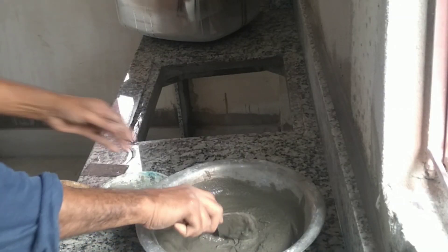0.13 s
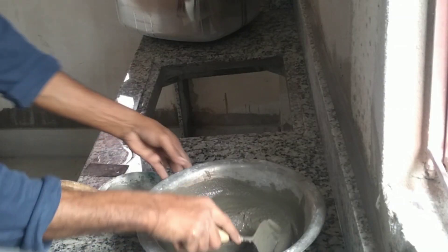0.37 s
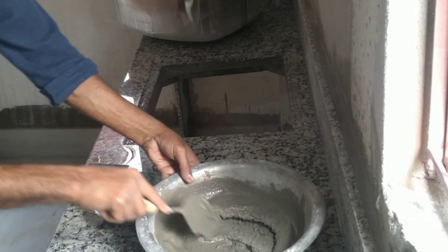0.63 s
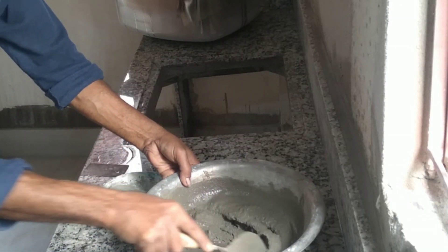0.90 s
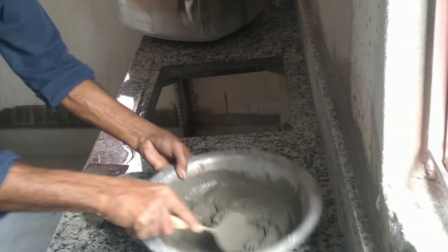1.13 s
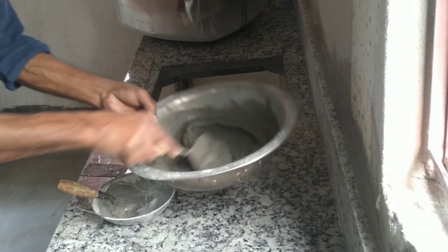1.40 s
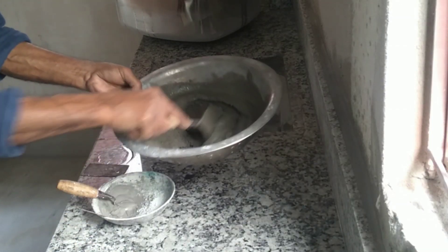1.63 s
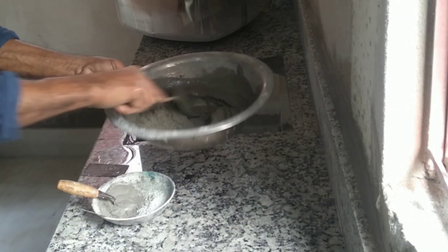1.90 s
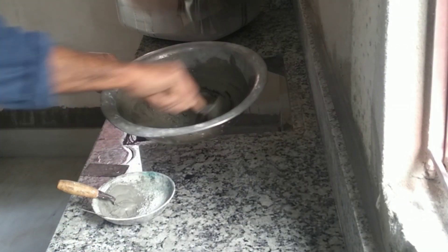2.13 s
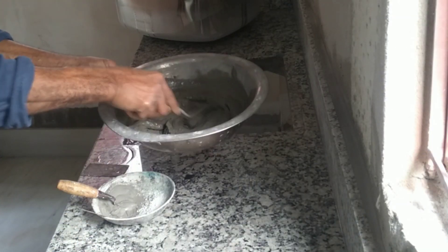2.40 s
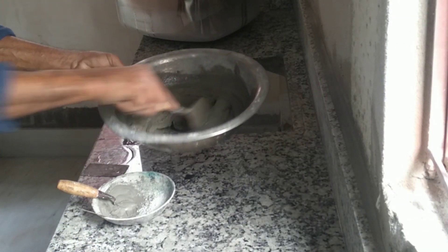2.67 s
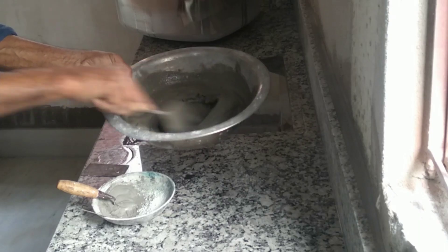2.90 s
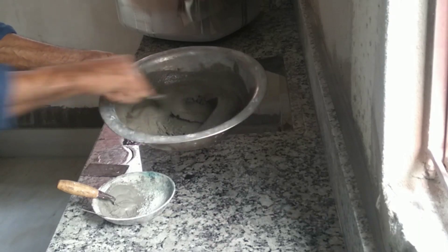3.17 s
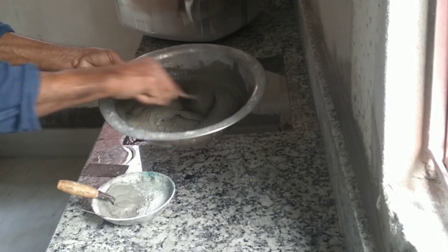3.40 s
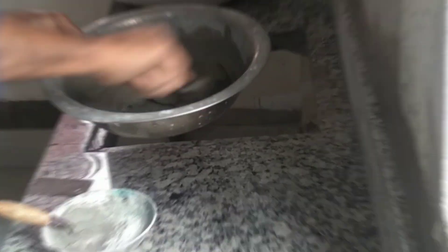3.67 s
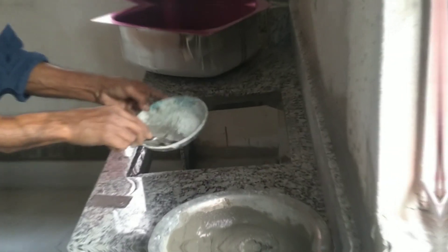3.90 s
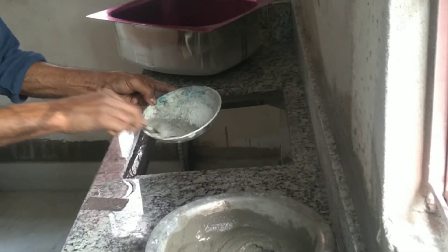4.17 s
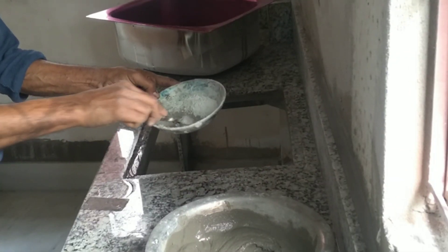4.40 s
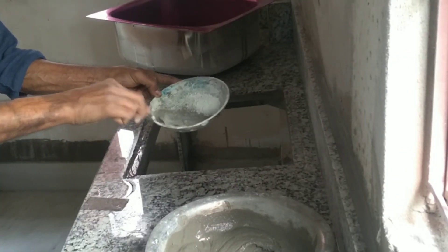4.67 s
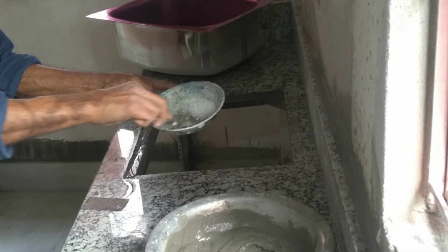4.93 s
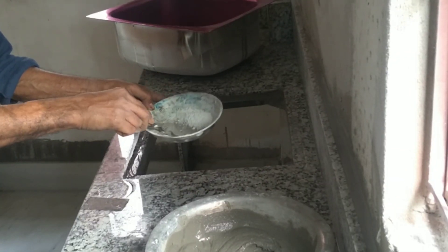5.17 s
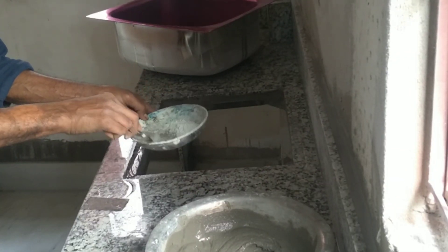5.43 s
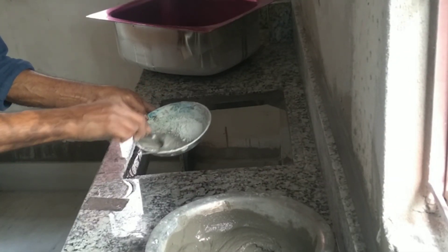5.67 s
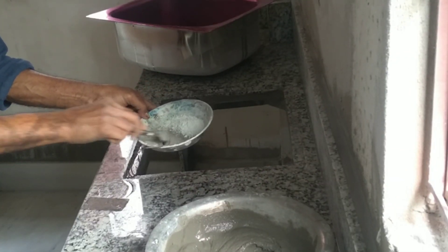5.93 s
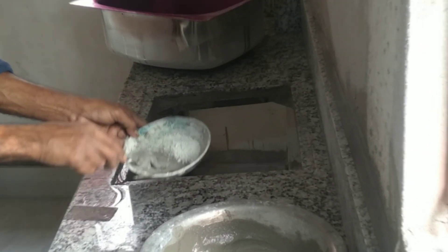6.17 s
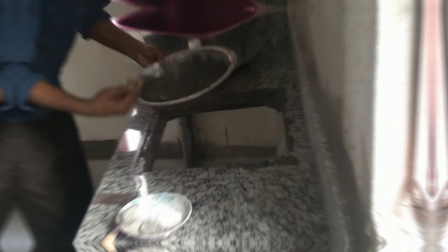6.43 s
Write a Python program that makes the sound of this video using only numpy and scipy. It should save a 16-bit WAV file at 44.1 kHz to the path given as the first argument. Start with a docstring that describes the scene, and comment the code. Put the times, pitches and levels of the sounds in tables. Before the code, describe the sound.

In a hard, echoing room, a steel trowel stirs gritty mortar in a big metal bowl, hesitant at first, then in quick, loud scrapes with clinks and a sharp knock. After a brief fade to silence, much quieter, thinner scrapes come from a small dish, with a faint distant chirp at first. Close stereo microphones, low rumble underneath.

```python
"""In a hard, echoing room, a trowel scrapes gritty mortar round a big metal bowl, then round a small dish.
Random ticks, like sand grains crushed under the blade, are coloured into a thud, boom, rasp and fizz.
Now and then steel clinks on steel: a noise crack, ringing tones and an echo tail.
Filtered noise makes the dull room tone and low rumble; chopped sine tones make a thin, far chirp.
Scraping, clinks and room tone share two brief fades to silence and back."""
import sys
import numpy as np
from scipy import signal
from scipy.fft import rfft, irfft, next_fast_len
from scipy.io import wavfile
from scipy.ndimage import uniform_filter1d, map_coordinates

SR = 44100
rng = np.random.default_rng(int(sys.argv[2]) if len(sys.argv) > 2 else 0)


def ratio(d):
    """dB to gain"""
    e = np.asarray(d, float) / 20
    return 10 ** e


def to_wav(s):
    """Save 16-bit WAV."""
    ch = np.atleast_2d(s).T  # columns
    pcm = np.round(np.clip(ch, -1, 1) * 32767)  # PCM
    wavfile.write(sys.argv[1], SR, pcm.astype(np.int16))


N = 289296  # length in samples

# Pushes of the blade through the mortar. Each row: start in seconds, rise in seconds, hold in seconds,
# scrape level in dB, boom in dB relative to the scrape, fizz in dB relative to the scrape.
PUSHES = [ (0, 0.078, 0.12, -59.5, 3.5, -6.5), (0.37, 0.035, .03, -40.5, -3, -6),
          (0.575, .02, 0.13, -63.5, -14, -3.5), (0.733, 0.0015, 0.063, -43.5, 2, -7),
          (0.784, 0.009, .002, -30.5, -9, -7.5), (0.989, 0.0044, 0.037, -48, 6.5, -1),
          (1.13, 0.025, .05, -64.5, -5, 0.5), (1.2, 0.016, 0.0022, -40.5, 2.5, -3.5),
          (1.373, 0.0029, 0.00223, -45.5, 0, 0.5), (1.385, .05, .03, -34.5, -9, -1.5),
          (1.486, 0.0059, .002, -32, -10, -12), (1.562, 0.011, .02, -37.5, -10, -15.5),
          (1.579, 0.049, 0.015, -30, -7, -8), (1.641, 0.033, .005, -32.5, -2, -9),
          (1.787, .01, 0.067, -35, 0, -4), (1.878, .025, 0.0022, -30, -7.5, -11.5),
          (2.071, .003, .02, -49, 7, -3), (2.096, 0.032, 0.071, -38.5, 0, -6),
          (2.181, .006, 0.036, -37.5, -0.5, 10.5), (2.207, 0.034, .015, -32.5, -2, 7),
          (2.344, 0.0057, 0.0014, -31.5, -26, 0), (2.37, 0.0075, .002, -27.5, -10.5, -10),
          (2.437, .015, .01, -41, 0, -9), (2.512, 0.029, .04, -44, -4, -3.5),
          (2.576, .016, 0.065, -37.5, 0.5, -1.5), (2.612, 0.06, 0.0016, -30, -9.5, -9),
          (2.711, .022, 0.0022, -32, -2.5, -7), (2.802, 0.0059, 0.05, -32, -0.5, -2.5),
          (2.902, 0.03, 0.052, -35, 1.5, -8.5), (3, 0.0036, 0.02, -34.5, -1, 3.5),
          (3.04, .01, .035, -33.5, -3.5, -9), (3.108, .03, 0.085, -34.5, -3.5, -3.5),
          (3.188, 0.049, 0.012, -27.5, -3.5, -9.5), (3.324, 0.0042, 0.025, -32, 1.5, -4.5),
          (3.359, 0.045, 0.0041, -34, 1, -2), (3.443, 0.016, .002, -44.5, 2.5, -9),
          (3.613, 0.0021, 0.00397, -56, -6.5, 6), (3.625, 0.024, .002, -48.5, -2, -4.5),
          (3.952, 0.0017, 0.0046, -60, -15, 11.5), (3.969, 0.038, .002, -49.5, 0.5, -6.5),
          (4.094, .02, 0.036, -68, 4, -1), (4.17, .025, .002, -56.5, -5, -4.5),
          (4.215, 0.025, .045, -54, -5, -5.5), (4.297, 0.0075, 0.026, -43.5, -9.5, -4),
          (4.434, 0.027, .015, -47, -7, -1), (4.47, 0.011, .002, -42, -11.5, -5),
          (4.53, .01, 0.026, -49.5, -12, -8), (4.593, 0.044, 0.035, -42.5, -9.5, -9),
          (4.702, 0.026, .01, -46, -10, -4), (4.767, 0.023, .002, -41, -9, -11),
          (4.9, .01, 0.091, -56.5, -9, -9), (4.965, 0.076, .002, -51.5, -4, 5),
          (5.08, 0.0244, .002, -51.5, -7, -13), (5.156, 0.019, 0.11, -59.5, -4, -13),
          (5.286, .02, 0.043, -68.5, -2, -5.5), (5.381, 0.034, 0.018, -60.5, -5, -10.5),
          (5.507, 0.055, 0.018, -53, -4, -0.5), (5.634, .034, .002, -44.5, -9.5, -6.5),
          (5.697, 0.035, .002, -41.5, -7.5, -2.5), (5.808, .01, 0.041, -49.5, -2.5, -2.5),
          (5.854, 0.039, .002, -41.5, -8.5, -11.5), (6.004, 0.018, 0.032, -72.5, 7, -1),
          (6.046, 0.036, .002, -49.5, -10, -7.5)]
# Where the blade's place moves the rings. Each row: time in seconds, bowl note in Hz, blade note in Hz.
MOVING_NOTES = [(0, 360, 2500), (.1, 660, 2080), (.47, 675, 2300), (.51, 350, 2500), (.72, 427, 3170),
                (.74, 580, 1900), (.8, 790, 2000), (.99, 800, 2100), (1.05, 673, 2000), (1.19, 725, 2150),
                (1.21, 530, 1800), (1.37, 524, 1450), (1.41, 554, 2800), (1.49, 550, 2500),
                (1.51, 365, 2300), (1.67, 540, 2030), (1.84, 495, 2000), (1.91, 450, 2800),
                (2.17, 785, 1620), (2.34, 710, 1837), (2.38, 348, 2240), (2.7, 546, 2040),
                (2.82, 365, 2160), (3.0, 570, 2300), (3.02, 407, 2600), (3.32, 405, 2350),
                (3.34, 950, 2250), (3.42, 464, 2080), (3.65, 346, 1408), (3.96, 542, 3160),
                (4.29, 455, 3300), (4.3, 480, 1820), (4.47, 590, 1500), (4.6, 418, 1910), (4.63, 925, 2800),
                (4.73, 415, 2850), (4.9, 365, 2800), (5.04, 420, 1550), (5.68, 490, 1600),
                (5.73, 780, 1850), (5.9, 780, 1560), (6.04, 540, 1960), (6.08, 530, 3460)]
# Thud through the counter. Each row: time in seconds, level in dB relative to the scrape.
THUD_LEVEL = [(0, -5.5), (.4, -10.5), (.75, -0.5), (.8, -17.5), (1.2, -11.5), (1.45, -15.5), (1.52, -14),
              (1.9, -20), (2.1, -5.5), (2.35, -13), (2.7, -27), (2.82, -14), (3.3, -23.5), (3.5, -16),
              (3.6, -24), (3.63, 2), (3.72, -17), (3.99, -33), (4.2, -14), (4.5, -28), (4.9, -9.5),
              (5.6, -17.5), (6.1, -24.5)]
# Times when the scraping sound sinks abruptly. Each row: start in seconds, end in seconds, depth in dB.
SCRAPE_GAPS = [(.272, 0.36, 60), (3.772, 3.957, 61.5), (5.364, 5.391, 10), (5.465, 5.496, 22),
               (6.24, 6.595, 60)]
# Colours of the four scraping layers. Each row: pitch in Hz, strength in dB per Hz.
THUD_COLOUR = [(88, -35.5), (150, -6.5), (199, -8.5), (264, 2.5), (312, 1), (380, -7), (490, -39),
               (840, -120)]
BOOM_COLOUR = [(190, -42.5), (320, -5), (539, 2), (706, -1), (878, 1), (981, -7.5), (1300, -15),
               (1690, -46), (2860, -120)]
RASP_COLOUR = [(530, -41.5), (900, -19.5), (979, -2.5), (1360, -2.5), (2270, -3), (2710, -4), (3330, -1),
               (5600, -14), (7280, -34.5), (12300, -120)]
FIZZ_COLOUR = [(2650, -22), (4500, -1.5), (5620, 0), (7070, -2), (9020, 3.5), (9410, 2), (10900, -11.5),
               (15100, -25), (16000, -22.5)]
# Fixed rings of the mortar-damped bowl. Each row: pitch in Hz, width in Hz, lift in dB.
BOWL_RINGS = [(230, 15, 6), (387, 60, 3), (535, 25, 5), (780, 40, 3), (897, 25, 5), (2290, 90, 2),
              (3410, 60, 1.5)]
# Fixed rings of the small dish, used after the first fade. Each row: pitch in Hz, width in Hz, lift in dB.
DISH_RINGS = [(1290, 40, 4), (1550, 30, 3), (1850, 45, 3), (3030, 55, 3), (3700, 40, 2)]
# How alike left and right are. Each row: pitch in Hz, likeness from 0 to 1.
LEFT_RIGHT_LIKENESS = [(30, .75), (60, .85), (120, .95), (190, .9), (300, .4), (1000, .08), (8000, .08)]
# Rumble levels. Each row: time in seconds, deep buffet in dB, hum in dB.
RUMBLE_LEVELS = [(0.0, -48, -56), (0.09, -54, -55.5), (0.11, -56, -54.5), (0.55, -50, -58.5),
                 (0.62, -44, -60), (0.78, -44.5, -52), (0.84, -41.5, -56), (1.09, -66, -56),
                 (1.2, -55.5, -53.5), (3.49, -59, -55.5), (3.69, -72, -66), (3.76, -79, -84),
                 (3.85, -58, -63.5), (4.29, -51.5, -56.5), (5.85, -46, -59), (6.27, -65.5, -67.5),
                 (6.34, -76.5, -83.5), (6.56, -63, -63)]
# Colours of the deep buffet and the hum. Each row: pitch in Hz, strength in dB per Hz.
BUFFET_COLOUR = [(7.1, -24.5), (12, 11.5), (31, 2), (60, -13), (78, -34.5), (130, -120)]
HUM_COLOUR = [(29, -32), (50, -4), (75, -9), (103, -8), (200, -20), (260, -41), (440, -120)]
# Room tone, heard in the pauses. Each row: time in seconds, level in dB.
AIR_LEVEL = [(0, -68.5), (.4, -63), (3.7, -71), (3.95, -68.5), (5.5, -67), (6.2, -76.5), (6.56, -74)]
# Colour of the room tone. Each row: pitch in Hz, strength in dB per Hz.
AIR_TINT = [(150, -28), (260, -3.5), (486, -16.5), (560, -11.5), (714, -20.5), (1300, -31.5), (1690, -56.5),
            (2860, -120)]
# Faint hiss of the microphones. Each row: time in seconds, level in dB.
HISS_LEVEL = [(0, -61), (.4, -88), (3.8, -79.5), (3.95, -76), (6.2, -103), (6.56, -95)]
# Colour of the hiss. Each row: pitch in Hz, strength in dB per Hz.
HISS_TINT = [(760, -30), (1300, 0), (1410, 1), (5970, -6.5), (8990, -8), (12000, -19), (15600, -49),
             (22000, -120)]
# Steel contacts. Each row: time in seconds, crack peak in dB, favoured pitch in Hz,
# ring in dB relative to the crack.
STEEL_CONTACTS = [(0.372, -50, 305, 12), (0.376, -53.5, 640, 16), (0.4, -47.5, 232, 3.5),
                  (0.73, -48.5, 155, 12), (0.732, -30, 1940, -4), (0.789, -17.5, 1993, -1.5),
                  (0.814, -21.5, 725, -8), (0.996, -35, 725, 4.5), (1.212, -46.5, 540, 10),
                  (1.376, -31.5, 1430, -1), (1.495, -13, 2345, -9.5), (1.614, -25, 1870, 10.5),
                  (1.681, -25, 2130, -9.5), (1.802, -20.5, 810, -4), (1.905, -15, 3380, -5.5),
                  (2.182, -23, 830, -15.5), (2.348, -17, 2970, -1.5), (2.361, -13.5, 3130, -10.5),
                  (2.372, -5.5, 4000, -9.5), (3.051, -14.5, 880, -10), (3.243, -13, 2320, -6.5),
                  (3.258, -24, 2567, 1.5), (3.331, -19, 882, 3.5), (3.354, -18, 858, -1.5),
                  (3.615, -41, 8870, 5), (3.956, -49, 8900, 5), (3.96, -41, 3420, 0),
                  (3.983, -56, 540, 12.5), (4.8, -34, 3010, 3), (6.085, -42, 3400, 0.5)]
# Modes a steel contact can ring. Each row: pitch in Hz, time to die by 60 dB in seconds.
STEEL_MODES = [(155, .08), (232, 0.57), (305, 0.35), (540, 0.17), (640, 0.35), (725, .06), (885, 0.064),
               (1430, 0.046), (1840, 0.075), (1960, .035), (2134, .05), (2325, 0.0461), (2580, .055),
               (3010, .035), (3400, 0.079), (4000, 0.045), (8900, 0.038)]
# How long the room echoes. Each row: pitch in Hz, time to die by 60 dB in seconds.
ECHO_TIMES = [(200, .36), (2000, .32), (10000, .22)]
# Dips to silence. Each row: quietest moment in seconds, fade-out in seconds, fade-in in seconds.
DIPS = [(3.79, .06, .08), (6.377, .1, .1)]
# Level of the far chirp. Each row: time in seconds, level in dB.
CHIRP_LEVEL = [(3.795, -83), (3.95, -74), (3.96, -59), (4.1, -60), (4.2, -57), (4.33, -57), (4.45, -61)]
# Tones that make up the chirp. Each row: pitch in Hz, strength in dB.
CHIRP_TONES = [(3050, -15), (3455, 0), (3890, -15), (4330, -19)]


def unit(x):
    """Scale a sound to an average (rms) strength of 1."""
    return x / np.sqrt(np.mean(x ** 2) + 1e-20)


def along(points, hz):
    """Read a table of (Hz, value) points on a log pitch axis."""
    f, v = np.transpose(points)
    return np.interp(np.log(hz + 1), np.log(f + 1), v)


def curves(rows):
    """Turn each column after the time into one value per sample."""
    s, *columns = np.transpose(rows)
    return [np.interp(np.arange(N) / SR, s, column) for column in columns]


def wobble(rate):
    """A smooth random curve with rate knots a second."""
    knots = rng.standard_normal(int(N * rate / SR) + 4)
    return map_coordinates(knots, [np.arange(N) * rate / SR])


def filtered(x, response):
    """Multiply the spectrum of x by a response that depends on pitch."""
    m = next_fast_len(N + SR // 2)
    return irfft(rfft(x, m) * response(np.fft.rfftfreq(m, 1 / SR)), m)[..., :N]


def spread(pair, colour):
    """Colour two unrelated signals and mix them to left and right, as alike as the table says."""
    def response(hz):
        angle = np.arccos(np.clip(along(LEFT_RIGHT_LIKENESS, hz), -1, 1)) / 2
        return ratio(along(colour, hz)) * [np.cos(angle), np.sin(angle)]

    mid, side = filtered(pair, response)
    return np.array([mid + side, mid - side])


def grit(spike_db, clump_db):
    """Sand crushed in clumps: dense ticks of uneven size, each smeared in time by the near walls."""
    spikes = spike_db * np.minimum(rng.exponential(size=(2, N)), 5)
    clumps = clump_db * (wobble(35) + wobble(130))
    ticks = ratio(spikes + clumps) * rng.standard_normal((2, N))
    t = np.arange(SR // 50) / SR
    walls = ratio(-60 * t / .008) * rng.standard_normal((2, SR // 50))
    walls[:, 0] = 6  # the direct sound
    smear = np.exp(1j * np.angle(rfft(walls, N)))  # keeps the delays, not the colour
    return unit(irfft(smear * rfft(ticks), N))


def ring_lift(rings, hz):
    """Add up the lift of fixed rings, each a rounded peak in the spectrum."""
    return sum(db / (1 + ((hz - centre) / width) ** 2) for centre, width, db in rings)


def ringing(x, note_hz, width, lift_db, patchy_db, size):
    """Lift the vessel's fixed rings and one ring that moves with the blade; evened to rms 1 over time."""
    overlap = size * 3 // 4
    hz, t, z = signal.stft(x, SR, nperseg=size, noverlap=overlap)
    note = note_hz[np.minimum((t * SR).astype(int), N - 1)]
    bowl, dish = ring_lift(BOWL_RINGS, hz), ring_lift(DISH_RINGS, hz)
    fixed = np.where(t < DIPS[0][0], bowl[:, None], dish[:, None])
    moving = lift_db / (1 + ((hz[:, None] - note) / (width * note)) ** 2)
    # random patches of loud and soft across pitch and time
    patches = uniform_filter1d(rng.standard_normal(moving.shape), size=5, axis=0)
    patches = uniform_filter1d(patches, size=8, axis=1)
    shaped = z * ratio(fixed + moving + patchy_db * unit(patches))
    y = signal.istft(shaped, nperseg=size, noverlap=overlap)[1][:, :N]
    power = np.abs(uniform_filter1d(np.mean(y, 0) ** 2, size=SR // 10))
    return y / np.sqrt(power + 1e-12)


def pushes(fall_bowl, fall_dish, share_db, gap_share):
    """Envelope of one layer: every push bites, rises, holds and dies (falls in dB/s); powers add."""
    steepen = 140  # the fall quickens by twice this many dB per second each second
    t, power = np.arange(0, N, 32) / SR, 0
    for (s, rise, hold, db, *_), more_db in zip(PUSHES, share_db):
        in_bowl = s < DIPS[0][0]
        fall = fall_bowl if in_bowl else fall_dish
        bite_db = 10.5 if in_bowl else 13  # a push starts this far under its peak
        after = np.maximum(t - s - rise - hold, 0)
        rise_db = -bite_db * np.clip(1 - (t - s) / rise, 0, 1)
        fall_db = -(fall + steepen * after) * after
        power = power + (t >= s) * ratio(2 * (db + more_db + rise_db + fall_db))
    lost_db = sum(depth * (t > a) * (t < b) for a, b, depth in SCRAPE_GAPS)
    level = uniform_filter1d(np.sqrt(power) * ratio(-gap_share * lost_db), size=3)
    return np.interp(np.arange(N) / SR, t, level)


def trowel():
    """The same grit thuds through the counter, booms in the vessel, rasps on the blade, fizzes on top."""
    (bowl_hz, blade_hz), (thud_db,) = curves(MOVING_NOTES), curves(THUD_LEVEL)
    boom_db, fizz_db = np.transpose(PUSHES)[-2:]
    even_db = 0 * boom_db
    sand = grit(spike_db=2.8, clump_db=1.2)
    thud = ringing(spread(sand, THUD_COLOUR), bowl_hz, width=.1, lift_db=0, patchy_db=1, size=2048)
    boom = ringing(spread(sand, BOOM_COLOUR), bowl_hz, width=.08, lift_db=8, patchy_db=1.5, size=2048)
    rasp = ringing(spread(sand, RASP_COLOUR), blade_hz, width=.2, lift_db=7, patchy_db=2.2, size=1024)
    fizz = ringing(spread(sand, FIZZ_COLOUR), blade_hz, width=.1, lift_db=0, patchy_db=1.6, size=512)
    # in the gaps the two low layers lose only a share of the depth
    thud = ratio(thud_db) * thud * pushes(75, 88.5, even_db, gap_share=0.24)
    boom = boom * pushes(83.5, 110, boom_db, gap_share=0.24)
    rasp = rasp * pushes(100, 139, even_db, gap_share=1)
    fizz = fizz * pushes(110, 151, fizz_db, gap_share=1)
    return fades() * (thud + boom + rasp + fizz)


def rumble():
    """A deep buffet in lumps, stronger on the left microphone, under a low hum of the building."""
    deep_db, hum_db = curves(RUMBLE_LEVELS)
    deep = unit(spread(rng.standard_normal((2, N)), BUFFET_COLOUR) * ratio([[3.2], [-3.2]]))
    hum = unit(spread(rng.standard_normal((2, N)), HUM_COLOUR))
    return ratio(deep_db + 1.8 * wobble(4)) * deep + ratio(hum_db + 0.75 * wobble(12)) * hum


def room_tone():
    """Dull air of the room over a faint hiss: two coloured noises with slowly drawn levels."""
    air = unit(spread(rng.standard_normal((2, N)), AIR_TINT))
    hiss = unit(spread(rng.standard_normal((2, N)), HISS_TINT))
    return ratio(curves(AIR_LEVEL)[0]) * air + ratio(curves(HISS_LEVEL)[0]) * hiss


def room(x):
    """A fresh echo tail of noise, each frequency dying at its own speed."""
    hz, t, z = signal.stft(rng.standard_normal((2, SR // 3)), SR, nperseg=256)
    dying = ratio(-60 * t / along(ECHO_TIMES, hz)[:, None])
    tail = signal.istft(z * dying, SR, nperseg=256)[1]
    late = np.pad(x, (260, 0))  # the echo starts 260 samples later
    return signal.fftconvolve(late[None], tail / np.linalg.norm(tail[0]), axes=1)


def clinks():
    """A short crack, the steel modes nearest to the favoured pitch, and the room's answer."""
    out, t = np.zeros((2, N + SR)), np.arange(SR // 4) / SR
    colour = signal.butter(3, [900, 8000], "bandpass", fs=SR)
    mode_hz, t60 = np.transpose(STEEL_MODES)[:, :, None]
    split = 0.026 * np.minimum(mode_hz / 900, 1) ** 2  # each mode is a close pair
    lower = np.sin(2 * np.pi * mode_hz * t * (1 - split))
    upper = np.sin(2 * np.pi * mode_hz * t * (1 + split))
    modes = (lower + upper) / 2 * ratio(-60 * t / t60)
    for s, db, hz, ring_db in STEEL_CONTACTS:
        burst = ratio(-60 * t / .009) * (rng.standard_normal((3, len(t))) + 4 * (t == 0))
        crack = signal.lfilter(*colour, burst)
        crack = crack[0] + 0.92 * crack[1:]  # each microphone hears it a little differently
        crack = crack / np.abs(crack.mean(0)).max()
        near = np.exp(-(np.log2(mode_hz / hz) / 0.1) ** 2)  # reach of 0.1 octave
        ring = (near * modes).sum(0) / near.sum()
        hit = ratio(db) * (crack + ratio(ring_db) * ring)
        sound = ratio(-9) * room(hit[0])
        sound[:, :len(t)] += hit
        out[:, round(s * SR):][:, :sound.shape[1]] += sound
    return out[:, :N]


def fades():
    """A level curve that sinks to nothing and comes back at each dip."""
    t = np.arange(N) / SR
    dips = [np.clip(np.maximum((s - t) / out, (t - s) / back), 0, 1) for s, out, back in DIPS]
    return np.prod(dips, axis=0)


def chirp():
    """A thin sine tone with faint side tones, all wavering in pitch, chopped into uneven pips."""
    t = np.arange(N) / SR
    beat = np.sin(2 * np.pi * np.cumsum(34 + 12 * wobble(14)) / SR)  # about 34 pips a second
    pips = np.clip(.8 + .6 * beat, 0, 1) * (t > CHIRP_LEVEL[0][0]) * (t < CHIRP_LEVEL[-1][0])
    tone = 0
    for hz, db in CHIRP_TONES:
        tone = tone + ratio(db) * np.sin(2 * np.pi * np.cumsum(hz + 12 * wobble(30)) / SR)
    return ratio(curves(CHIRP_LEVEL)[0]) * np.sqrt(2) * pips * tone


def scene():
    """Trowel work slightly to the right, over the background."""
    work = (trowel() + fades() * clinks()) * ratio([[-.4], [.4]])
    return work + rumble() + fades() * room_tone() + chirp()


def roll_off(x):
    """The treble ends steeply here."""
    return signal.sosfilt(signal.butter(12, 16470, fs=SR, output="sos"), x)


def record(dry):
    """Cut everything from 15850 Hz up and deliver the finished mix."""
    mix = filtered(dry, lambda hz: hz < 15850)
    return roll_off(mix)


dry = scene()
out = record(dry)
to_wav(out)
```